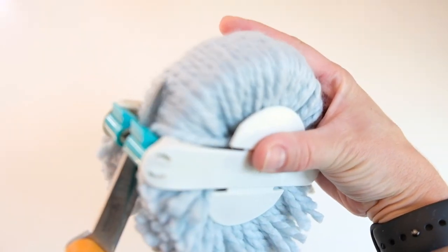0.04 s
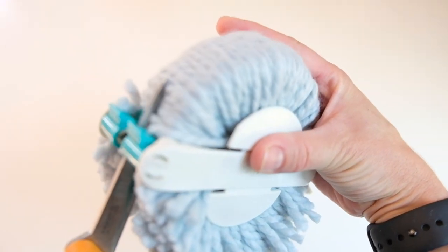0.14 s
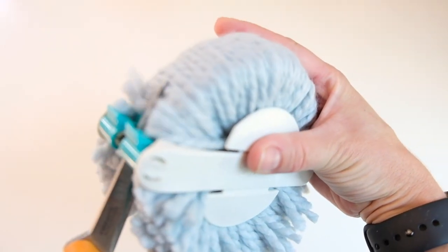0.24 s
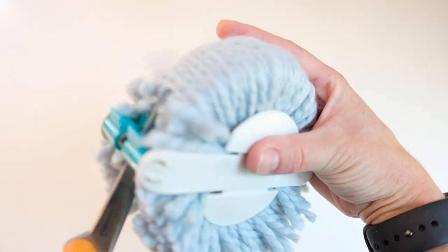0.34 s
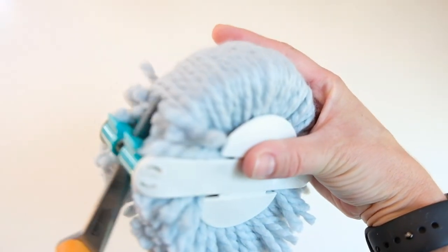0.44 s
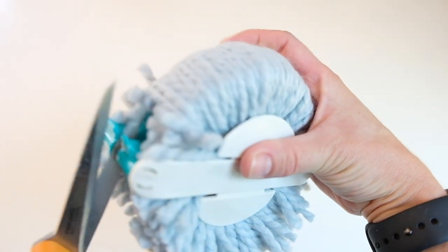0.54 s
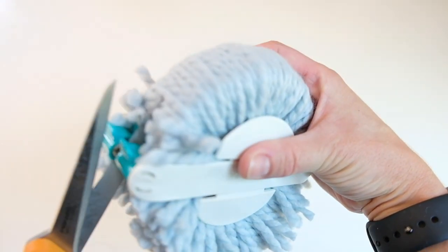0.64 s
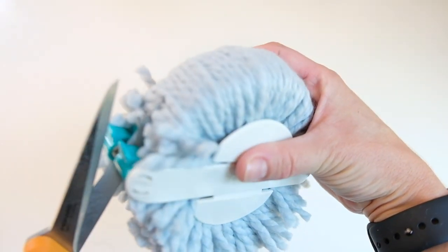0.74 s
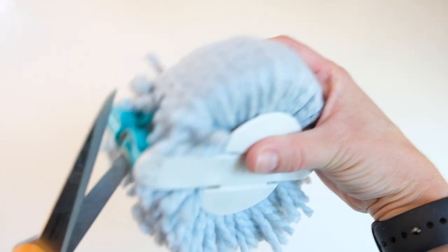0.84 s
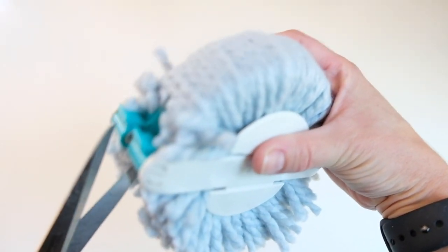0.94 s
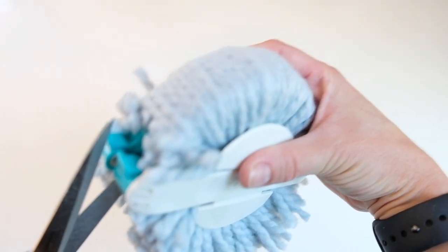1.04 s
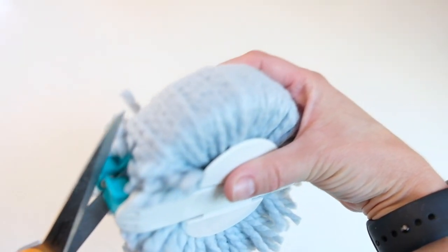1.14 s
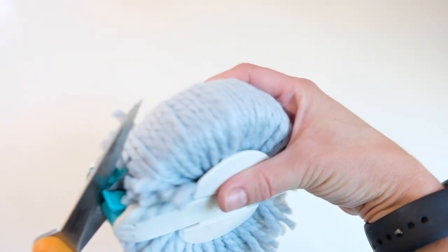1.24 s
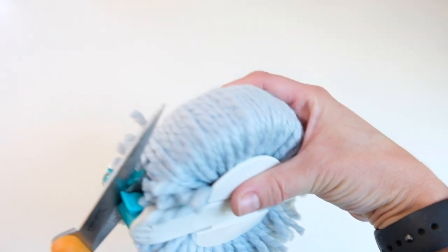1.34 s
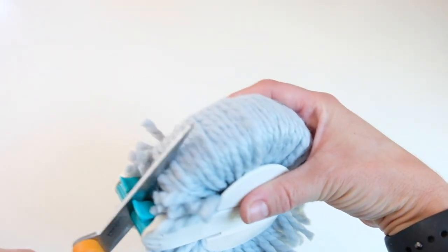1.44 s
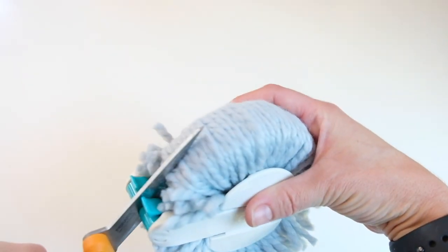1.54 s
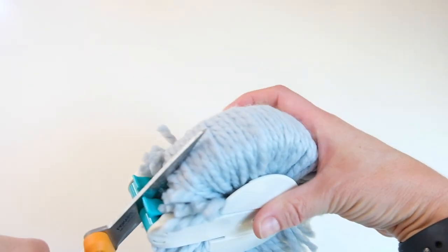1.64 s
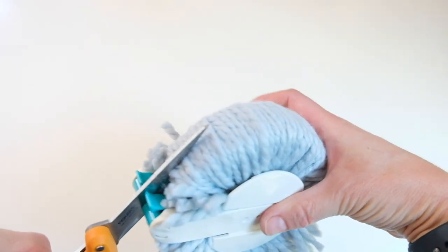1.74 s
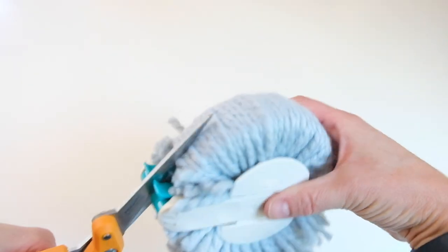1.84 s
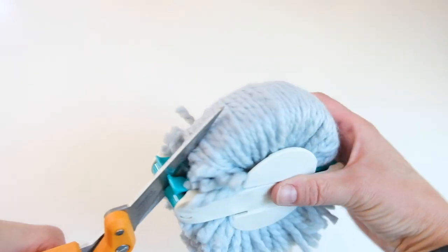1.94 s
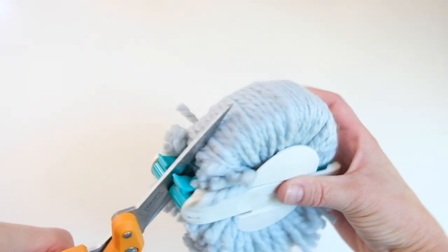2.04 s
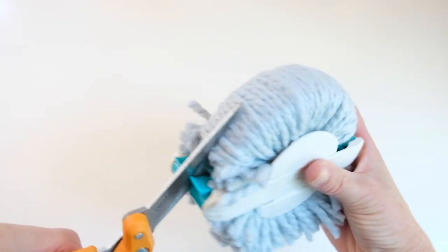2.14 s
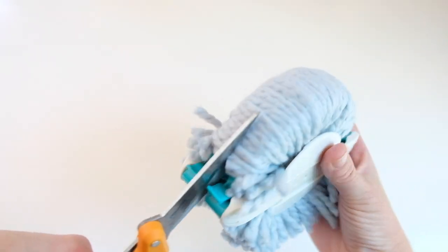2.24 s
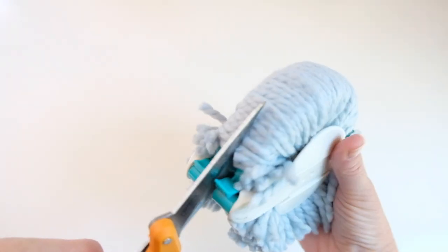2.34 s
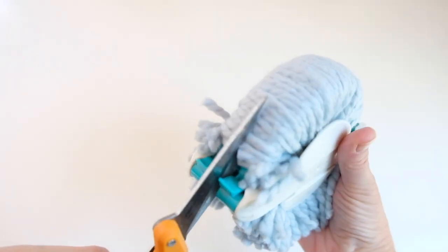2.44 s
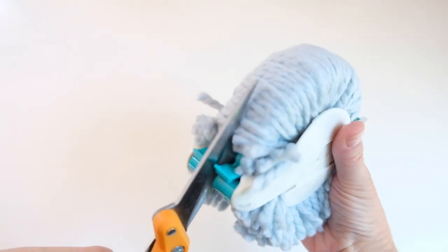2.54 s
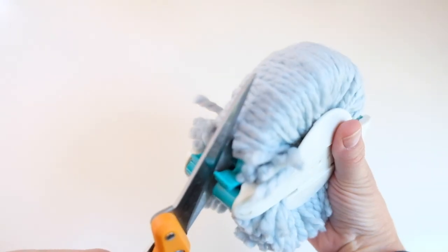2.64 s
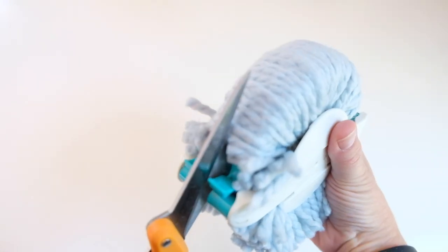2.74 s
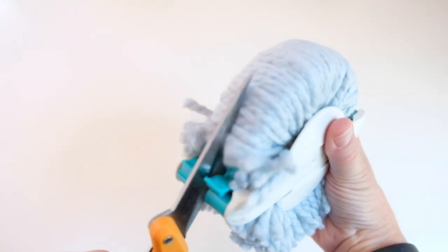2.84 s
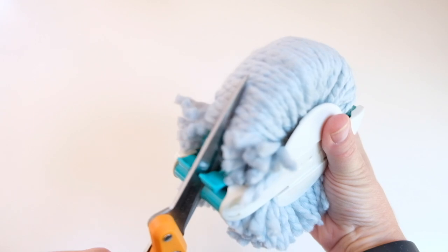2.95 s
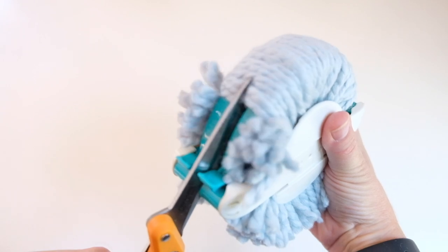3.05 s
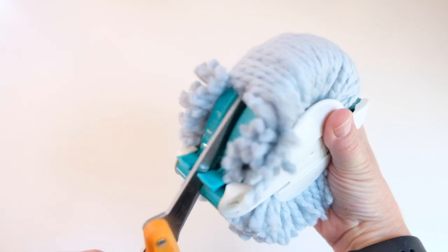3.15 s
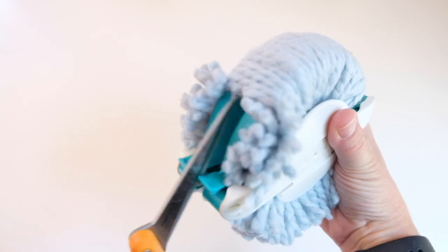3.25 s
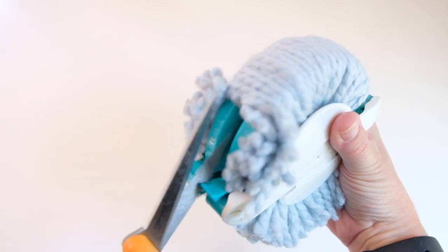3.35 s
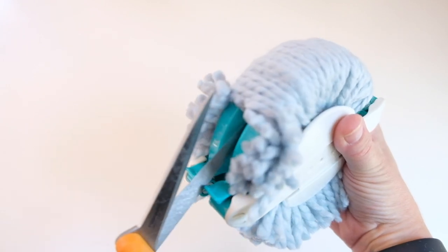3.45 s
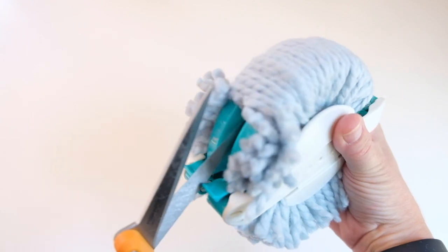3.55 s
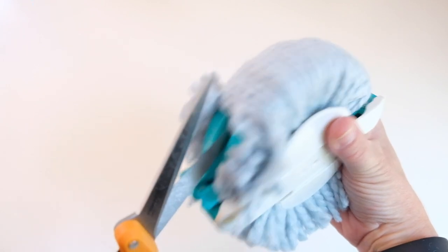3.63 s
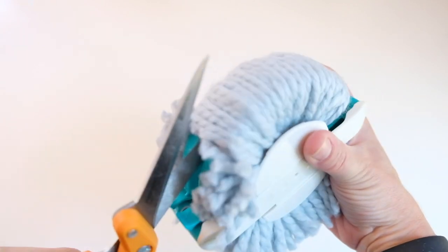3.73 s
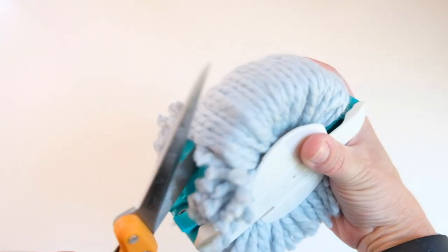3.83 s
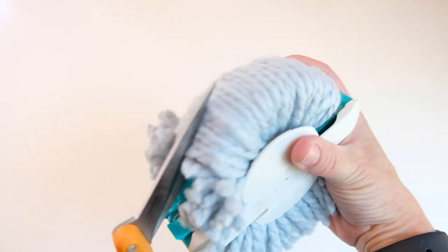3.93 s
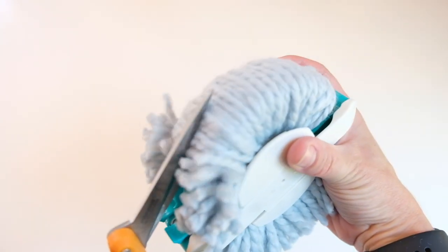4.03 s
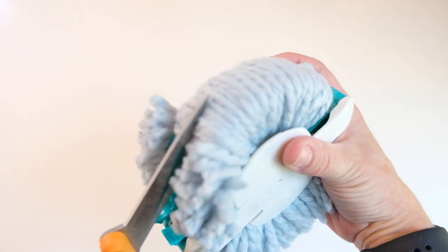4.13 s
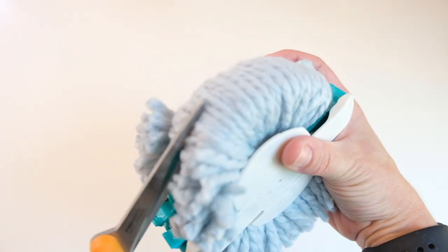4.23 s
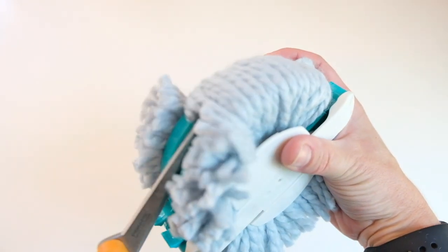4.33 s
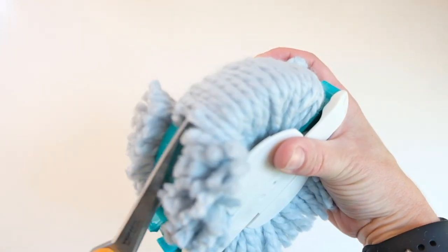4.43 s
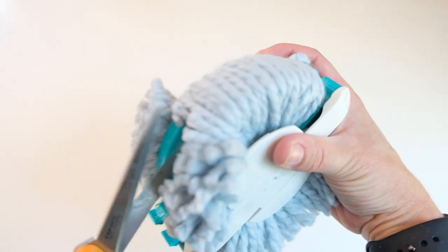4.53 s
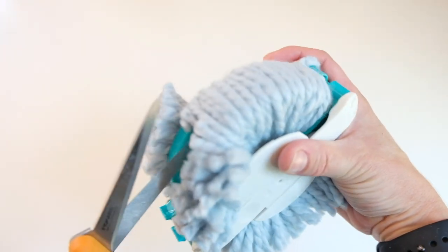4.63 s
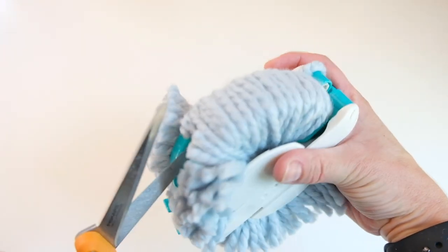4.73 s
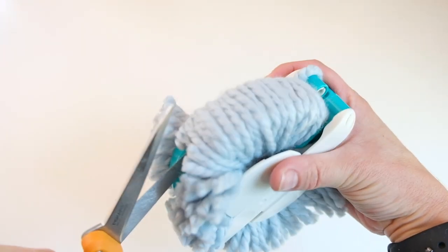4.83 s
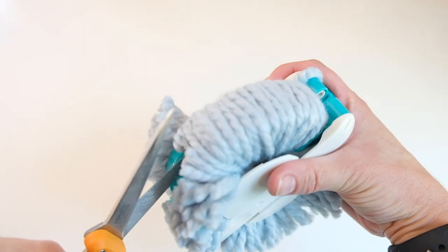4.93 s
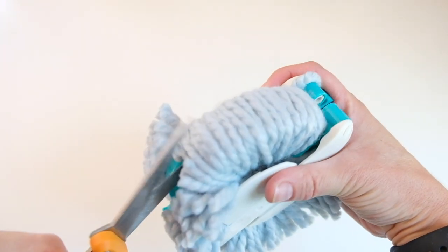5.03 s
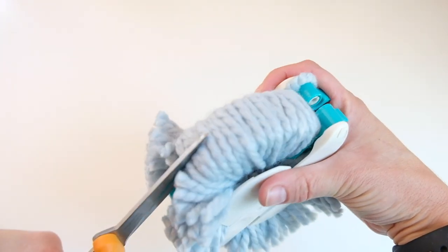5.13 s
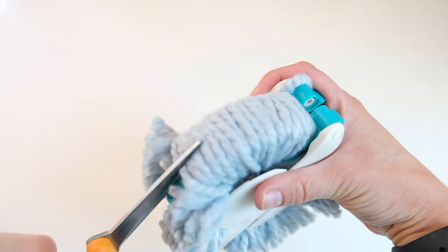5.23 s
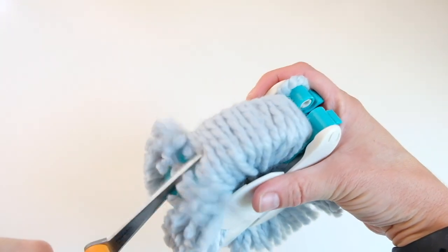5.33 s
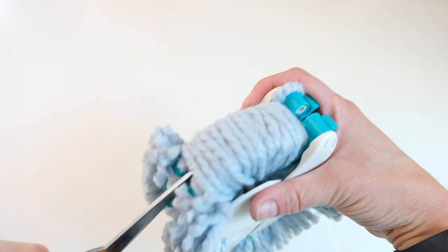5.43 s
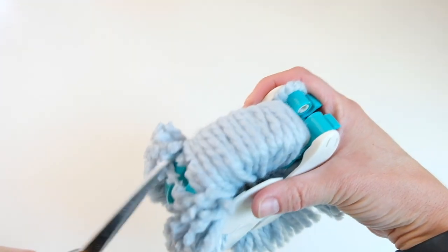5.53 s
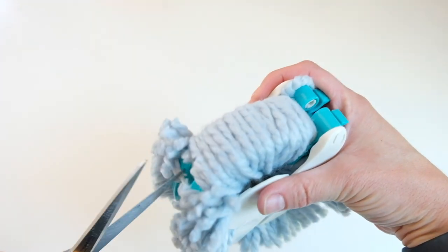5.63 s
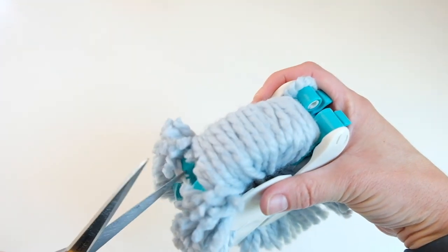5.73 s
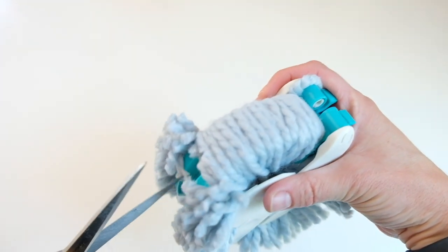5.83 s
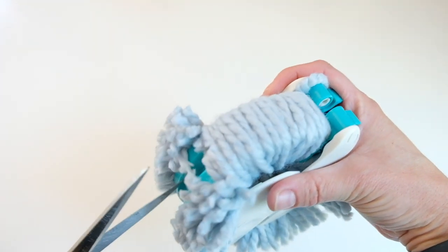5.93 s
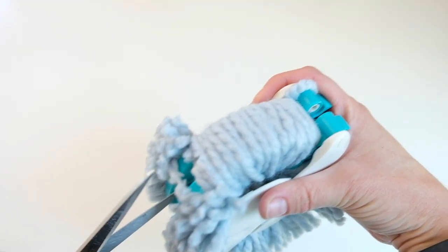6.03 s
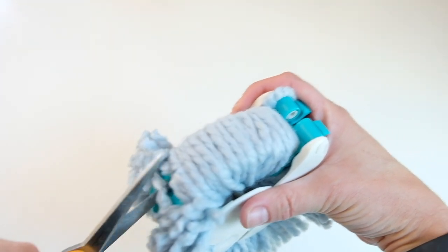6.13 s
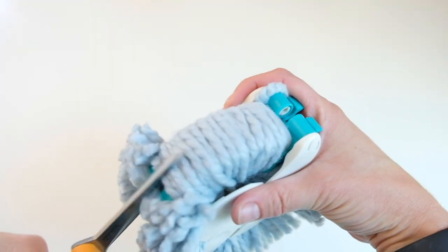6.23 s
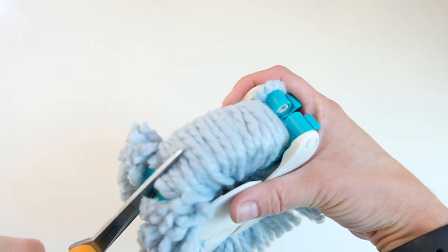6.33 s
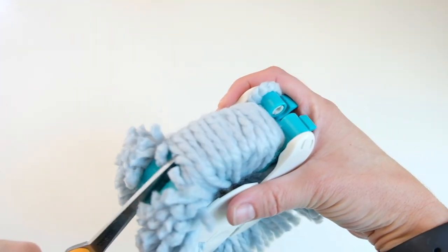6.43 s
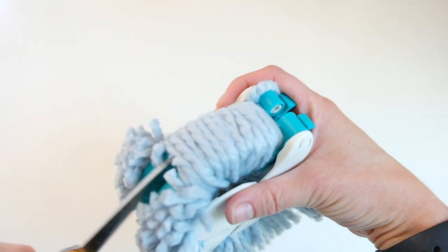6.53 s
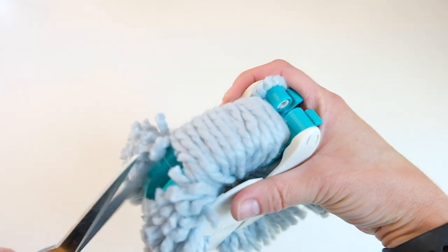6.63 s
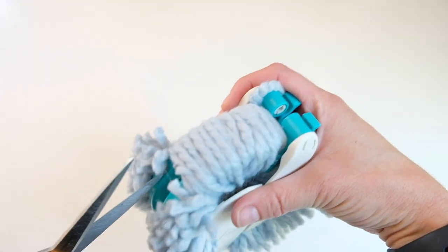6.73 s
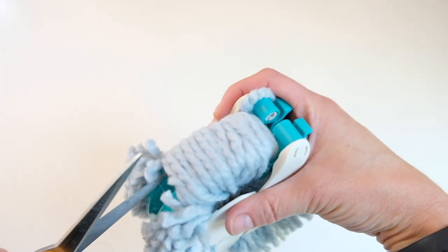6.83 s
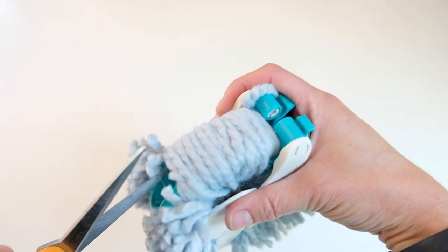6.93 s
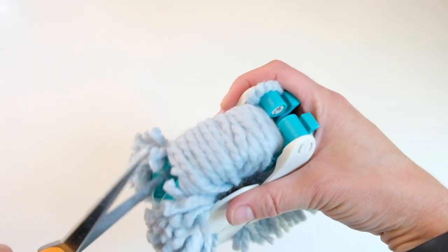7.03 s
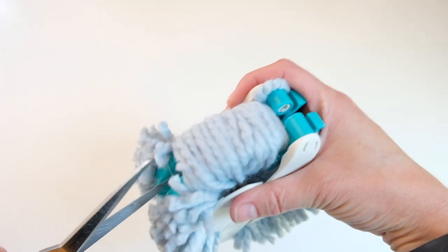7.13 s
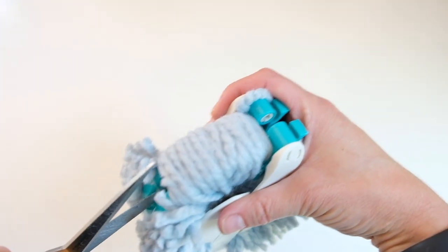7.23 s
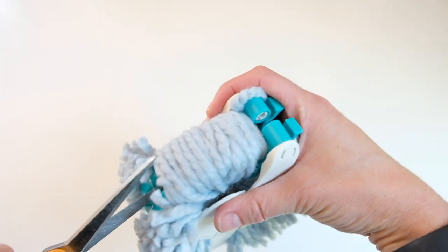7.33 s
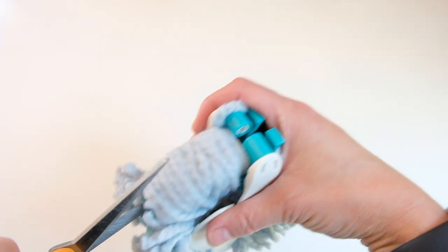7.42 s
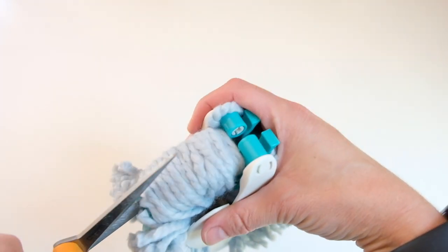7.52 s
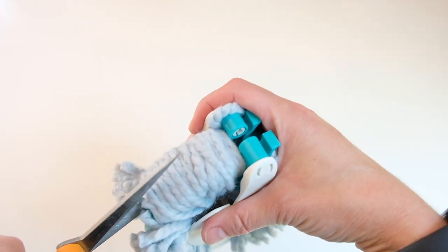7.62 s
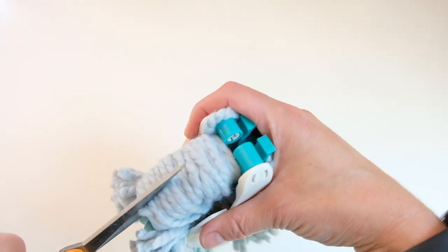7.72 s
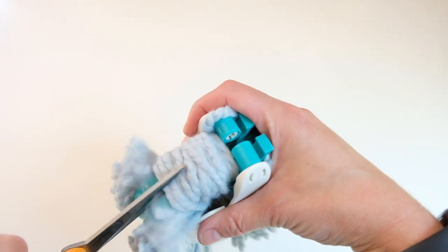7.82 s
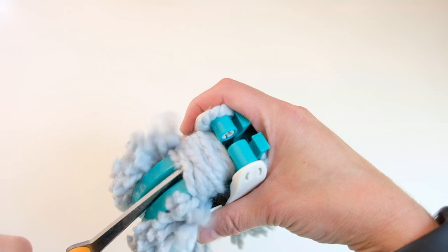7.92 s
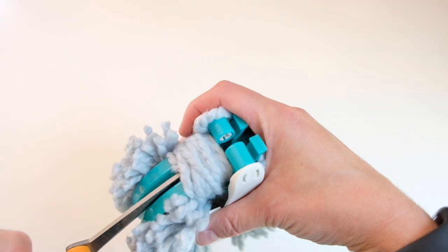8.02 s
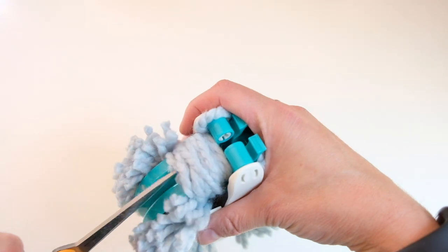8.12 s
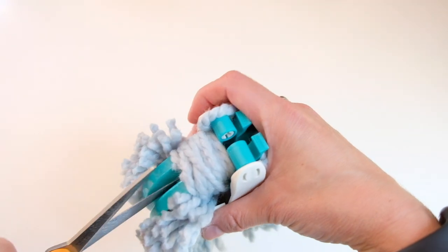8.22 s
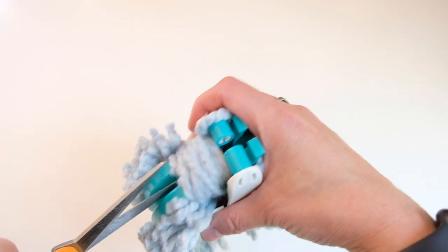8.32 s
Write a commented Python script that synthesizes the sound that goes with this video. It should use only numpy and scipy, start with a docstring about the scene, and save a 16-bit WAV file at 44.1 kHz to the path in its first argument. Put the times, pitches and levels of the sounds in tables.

```python
"""In a quiet room, close by, steel scissors cut thick yarn wound on a plastic pompom maker.
In each stroke the blades rub, strands part one after another, and the last bundle gives with a sharp snip.
Between strokes the blades knock on the plastic and push into the wool, and the hand turns the tool, once
with a faint squeak. Cutting, rubbing and rustling are made of many tiny random clicks; knocks are short
blows that ring. The table and walls echo, and something hums faintly behind."""
import sys
import numpy as np
from scipy import signal
from scipy.fft import rfft, irfft
from scipy.io import wavfile
from scipy.ndimage import uniform_filter1d

SR = 44100
rng = np.random.default_rng(int(sys.argv[2]) if len(sys.argv) > 2 else 0)


def wrap_up_sound(samples):
    """Save the sound to the file named by the first command line argument, as 16-bit audio."""
    columns = np.atleast_2d(samples).T
    # keep every value between -1 and 1, then stretch to whole-number steps
    tamed = np.clip(columns, -1, 1)
    steps = np.round(tamed * 32767).astype(np.int16)
    wavfile.write(sys.argv[1], SR, steps)


N = 369161

# The blades shut. Each row: start in seconds, relative level in dB, added brightness in dB per octave,
# how many seconds earlier the bundle tears, relative level of the squeezed wool in dB.
SNIPS = [(0.319, -18, -0.1, 0.0023, -62.5), (3.115, -17.5, 1, 0.0026, -63),
         (4.294, -18.5, 2.5, 0.0019, -66), (5.3608, -18.5, 2.7, 0.0013, -66.5),
         (6.4367, -23, 1.5, 0.00097, -77), (7.914, -20, -1.6, 0.0044, -68)]
# Scissors hit plastic. Each row: start in seconds, relative level in dB, hardness in dB
# (minus is hollow body, plus is steel edge), main ringing pitch in Hz.
KNOCKS = [(0.4846, -40, -2.5, 1830), (0.493, -40, -2, 1500), (0.9104, -46.5, 5.5, 2860),
          (1.0042, -46.5, -12, 1630), (1.048, -43, 5.5, 2750), (1.1337, -49, -2.5, 3550),
          (1.166, -54, -5, 2970), (1.388, -53.5, -5, 3900), (2.058, -54.5, -8, 3800),
          (2.2137, -56, -7, 3700), (3.273, -41.5, 0.5, 2930), (3.356, -43.5, -4.5, 3250),
          (3.3859, -33, -2.5, 3350), (3.672, -49, 1, 3770), (3.7015, -43.5, 9, 5900),
          (4.3113, -25, 2, 1860), (4.5179, -38, -2.5, 1970), (5.6378, -33.5, -5.5, 2730),
          (6.6862, -33.5, -3.5, 1860), (7.0985, -36, 4.5, 2250), (7.2463, -43.5, 6.5, 2290),
          (7.2722, -44.5, -3, 2450), (7.435, -47.5, -2.5, 2320), (7.473, -52.5, -11, 2300),
          (8.1816, -26, 5, 2560), (8.2327, -36, 0.5, 3000)]
# The tones the steel blades ring with. Each row: pitch in Hz, width in Hz, gain in dB.
BLADE_MODES = [(2845, 160, -11.5), (4740, 300, -2), (7540, 530, -10), (8810, 400, 0), (10040, 400, -1.5),
               (12950, 810, -10)]


def from_db(db):
    """Turn decibels into a number to multiply by."""
    return 10 ** (np.asarray(db) / 20)


def rms_one(x):
    """Scale a sound so that its average level (rms) is 1."""
    return x / np.sqrt(np.mean(x ** 2) + 1e-20)


def at_level(sound, where, level_db):
    """Scale a sound so that the chosen part has the given average level."""
    return sound * from_db(level_db) / np.sqrt(np.mean(sound[where] ** 2) + 1e-20)


def at_hz(points, hz):
    """Read between the rows of a frequency table, giving each octave equal room."""
    freqs, values = np.transpose(points)
    return np.interp(np.log(np.maximum(hz, 1)), np.log(freqs), values)


def add(track, s, sound):
    """Mix a sound into the track, starting at s seconds."""
    start = round(s * SR)
    sound = sound[max(-start, 0):max(N - start, 0)]
    track[max(start, 0):max(start, 0) + len(sound)] += sound


def colour(x, spectrum, tilt_db=0, size=1024):
    """Shape a sound's lows and highs; tilt_db brightens it by that much per octave above 1000 Hz."""
    hz = np.arange(size // 2 + 1) * SR / size
    octaves = np.log2(np.maximum(hz, 1000) / 1000)
    gains = from_db(at_hz(spectrum, hz) + tilt_db * octaves)
    # Build a minimum-phase filter, so that nothing sounds ahead of a click.
    cepstrum = irfft(np.log(gains))
    cepstrum[1:size // 2] *= 2
    cepstrum[size // 2 + 1:] = 0
    response = irfft(np.exp(rfft(cepstrum)))
    return signal.fftconvolve(x, response / np.linalg.norm(response))[:len(x)]


def resonate(x, hz, width_hz):
    """Ring at one pitch; the wider the resonance, the sooner it dies away."""
    radius = np.exp(-np.pi * width_hz / SR)
    feed = np.array([1, 0, -1]) * (1 - radius ** 2) / 2
    feedback = [1, -2 * radius * np.cos(2 * np.pi * hz / SR), radius ** 2]
    return signal.lfilter(feed, feedback, x)


def ringing(x, modes):
    """A shaken object rings with all its own tones (modes) at once."""
    return sum(from_db(db) * resonate(x, hz, width_hz) for hz, width_hz, db in modes)


def drift(rate):
    """A curve that wanders around zero, heading for a new random value rate times a second."""
    steps = np.arange(N) * rate / SR
    count = int(steps[-1]) + 2
    return np.interp(steps, np.arange(count), rng.standard_normal(count))


def fibres(length, per_s, spread_db):
    """Tiny cracks at random moments and of uneven size."""
    sizes = from_db(spread_db * np.minimum(rng.exponential(1, length), 4))
    cracking = rng.random(length) < per_s / SR
    return rms_one(cracking * sizes * rng.choice([-1, 1], length))


def swell(half_s, steepness):
    """Give the time around a push's peak, and its force, which builds quickly and lets go more slowly."""
    t = np.arange(-4096, 4096) / SR
    from_peak = np.minimum(steepness * abs(t) / half_s, 50)
    return t, np.where(t < 0, np.exp(-from_peak ** 2 / 2), 1 / np.cosh(from_peak))


def bump(middle_s, build_s, release_s):
    """A smooth movement of the hand: from 0 to 1 and back."""
    t = np.arange(N) / SR - middle_s
    width_s = np.where(t < 0, build_s, release_s)
    return np.exp(-np.minimum((t / width_s) ** 2 / 2, 20))


def background(waver_db=1.0, air_db=-65):
    """Even room noise and a slightly wavering hum."""
    # The hum swells and fades. Each row: time in seconds, level in dB.
    hum_levels = [(0.0, -75), (0.44, -69), (2.38, -74), (2.68, -85), (3.35, -69), (4.94, -72.5),
                  (5.5, -63.5), (6.95, -67), (8.37, -64)]
    # The hum's tones. Each row: pitch in Hz, relative level in dB.
    hum_tones = [(113.4, -15.5), (226.8, 0), (354, -17)]
    # The tone colour of the room noise. Each row: frequency in Hz, relative level in dB.
    air_colour = [(12, -41.5), (20, 1), (72, 3.5), (171, -4), (225, -2.5), (282, -5.5), (333, -6.5),
                  (614, -10.5), (834, -11.5), (1270, -17.5), (1670, -22.5), (5690, -28), (8400, -26),
                  (14300, -22.5), (15500, -24.5)]
    t = np.arange(N) / SR
    hum = np.zeros(N)
    for hz, db in hum_tones:
        hum += from_db(db + waver_db * drift(2.7)) * np.sin(2 * np.pi * hz * t + .4 * drift(4))
    hum_level = from_db(np.interp(t, *np.transpose(hum_levels)))
    air = colour(rng.standard_normal(N), air_colour, size=8192)
    return np.sqrt(2) * hum_level * hum + from_db(air_db) * air


def wool(rest_db=-71.5, stir_db=-73.5, flutter_db=1.55, gain_db=1.0):
    """Fibres brush past fingers and blades in uneven clumps, most around each stroke and knock."""
    # The tone colour of the rustle. Each row: frequency in Hz, relative level in dB.
    wool_colour = [(100, 4.5), (350, 3), (600, -0.5), (1000, -2), (2200, -1.5), (4000, -6.5), (8500, -6),
                   (12000, -21), (15500, -29.5)]
    squeezes = [from_db(db) * bump(s, build_s=.22, release_s=.23) for s, *_, db in SNIPS]
    stirs = [from_db(stir_db) * bump(s, build_s=.08, release_s=.08) for s, *_ in KNOCKS]
    pressure = np.sqrt(from_db(rest_db) ** 2 + sum(move ** 2 for move in squeezes + stirs))
    clumps = from_db(gain_db + flutter_db * drift(45))
    return colour(pressure * clumps * fibres(N, per_s=5000, spread_db=3.0), wool_colour)


def rubs(typical_db=-36.5, ring_db=10.5, gain_db=-5.5):
    """Blade slides on blade: the friction hisses and sets the steel singing."""
    # The slides. Each row: peak time in seconds, relative level in dB, rough half length in seconds.
    slides = [(0.024, -46.5, 0.026), (2.869, -42.5, 0.012), (3.99, -41.5, 0.011), (4.789, -57.5, .022),
              (5.121, -58.5, 0.0088), (6.265, -49.5, 0.015), (6.39, -49.5, 0.02), (6.42, -31.5, 0.0037),
              (6.427, -29, .0027), (7.802, -44.5, 0.0074), (7.845, -39, 0.011)]
    # The tone colour of the scrape. Each row: frequency in Hz, relative level in dB.
    rub_colour = [(200, -24), (600, 9), (1200, -2.5), (2500, 5), (4500, 2), (6500, -4.5), (10000, -7.5),
                  (13000, -12), (15500, -22)]
    out = np.zeros(N)
    for s, level_db, half_s in slides:
        t, force = swell(half_s, steepness=1.72)
        friction = force * fibres(len(t), per_s=8900, spread_db=6.0)
        steel = from_db(ring_db) * ringing(friction, BLADE_MODES)
        tilt_db = 6.5 + .4445 * (level_db - typical_db)  # a harder rub is brighter
        scrape = colour(friction + steel, rub_colour, tilt_db)
        add(out, s + t[0], nearby(at_level(scrape, abs(t) < half_s, level_db + gain_db)))
    return out


def pushes(gain_db=-1.0):
    """A blade pushed along the plastic, under the loops of wool, gives a dull rasp."""
    # The pushes. Each row: peak time in seconds, relative level in dB, rough half length in seconds.
    moves = [(0.081, -47, 0.013), (0.509, -57.5, 0.012), (1.5, -57.5, .03), (2.866, -50.5, 0.024),
             (3.679, -62.5, 0.02), (3.913, -52, 0.011), (3.976, -55.5, 0.019), (6.869, -69, 0.026),
             (7.753, -56, 0.027)]
    # The tone colour of the rasp. Each row: frequency in Hz, relative level in dB.
    push_colour = [(300, -17), (800, -2), (1200, 6.5), (1600, 0.5), (2400, 2.5), (4400, -4.5),
                   (6500, -17.5), (10000, -4), (15500, -26)]
    out = np.zeros(N)
    for s, level_db, half_s in moves:
        t, force = swell(half_s, steepness=1.4)
        rasp = colour(force * fibres(len(t), per_s=4100, spread_db=5.5), push_colour)
        add(out, s + t[0], nearby(at_level(rasp, abs(t) < half_s, level_db + gain_db)))
    return out


def strands(typical_db=-40, typical_half_s=.0048, tear_db=-28.5, ring_db=2.0, gain_db=-5.0):
    """Strands part one by one, lightly ringing the blades; the last bundle tears just before each snip."""
    # Single strands part. Each row: peak time in seconds, relative level in dB.
    breaks = [(0.106, -40), (0.149, -39.5), (0.226, -35), (0.55, -49.5), (2.892, -38), (2.984, -31.5),
              (3.015, -43.5), (3.332, -45), (4.038, -46), (4.084, -42.5), (4.11, -43.5), (4.2766, -33.5),
              (5.212, -49), (5.259, -41.5), (5.287, -35.5), (5.316, -33.5), (5.594, -47.5), (6.659, -51)]
    # The tone colour of the crunch. Each row: frequency in Hz, relative level in dB.
    strand_colour = [(200, -14), (700, -11), (1700, -10), (2800, 2), (4500, -2.5), (8000, -1.5),
                     (10000, -9.5), (13000, -10.5), (15500, -23)]
    # A tighter strand parts louder and quicker: 14.5 dB more halves its length.
    singles = [(s, db, typical_half_s * .5 ** ((db - typical_db) / 14.5)) for s, db in breaks]
    tears = [(s - tear_s, tear_db, tear_s) for s, _, _, tear_s, _ in SNIPS]
    out = np.zeros(N)
    for s, level_db, half_s in singles + tears:
        t, force = swell(half_s, steepness=1.3)
        cracks = force * fibres(len(t), per_s=11000, spread_db=4.5)
        steel = from_db(ring_db) * ringing(cracks, BLADE_MODES)
        tilt_db = 1.8 + .4445 * (level_db - typical_db)  # it is brighter too
        crunch = colour(cracks + steel, strand_colour, tilt_db)
        add(out, s + t[0], nearby(at_level(crunch, abs(t) < half_s, level_db + gain_db)))
    return out


def snips(burst_s=.0027, after_db=-10.5, fall_s=.004, jolt_db=2.5):
    """Many fibres snap within a few milliseconds, and the blades jump shut with a jolt."""
    # The tones that the jolt sets ringing. Each row: pitch in Hz, width in Hz, gain in dB.
    jolt_modes = [(74, 130, 7), (295, 140, 6), (793, 240, 18), (2770, 160, 15.5)]
    # The tone colour of the snap. Each row: frequency in Hz, relative level in dB.
    snap_colour = [(150, -22), (480, -24.5), (800, -15), (1400, -9.5), (2000, -9.5), (2900, -1),
                   (4200, -3.5), (5000, 2), (6000, 1.5), (8000, 1), (9500, -5.5), (13000, -9.5),
                   (15500, -26)]
    out, t = np.zeros(N), np.arange(2048) / SR
    jolt = from_db(jolt_db) * ringing(signal.unit_impulse(len(t)), jolt_modes)
    fade = from_db(after_db) * np.exp(-np.maximum(t - burst_s, 0) / fall_s)
    force = np.where(t < burst_s, 1, fade)
    for s, level_db, tilt_db, _, _ in SNIPS:
        cracks = force * fibres(len(t), per_s=26000, spread_db=2.0)
        snap = at_level(colour(cracks, snap_colour, tilt_db), t < burst_s, 0)
        add(out, s, nearby(from_db(level_db) * (snap + jolt)))
    return out


def knocks(chatter_db=-21.0, chatter_s=.0026, ring_db=7.0, ring_width_hz=260, gain_db=-2.0):
    """A blow and a brief chatter ring the scissors and plastic, which the hand quickly quiets."""
    # The tones of scissors and plastic together. Each row: pitch in Hz, width in Hz, gain in dB.
    knock_modes = [(318, 440, 0.5), (705, 250, -14), (1110, 620, 0), (2060, 590, 2.5), (3130, 320, -1.5),
                   (5000, 3100, -2), (7380, 600, 1), (8120, 560, -21.5), (12300, 2500, -20)]
    out, t = np.zeros(N), np.arange(2048) / SR
    for s, level_db, hard_db, ring_hz in KNOCKS:
        contact = from_db(chatter_db) * rng.standard_normal(len(t)) * np.exp(-t / chatter_s)
        contact[0] -= 1  # the blow itself
        ring = ringing(contact, knock_modes + [(ring_hz, ring_width_hz, ring_db)])
        # A harder spot gives less low body and more bright edge.
        body = [(300, -2.5 - hard_db), (800, -3 - hard_db)]
        edge = [(1700, .012), (3500, .0029), (6500, -3 + hard_db)]
        knock = colour(ring, body + edge)
        add(out, s, nearby(at_level(knock, t < .004, level_db + gain_db)))
    return out


def regrips(flutter_db=4.5):
    """The hand turns the tool, and skin slides over the hollow plastic with a low rustle."""
    # The turns. Each row: peak time in seconds, level in dB, rough half length in seconds.
    turns = [(0.679, -63, 0.29), (2.341, -66.5, .18)]
    # The tones of the hollow plastic. Each row: pitch in Hz, width in Hz, gain in dB.
    plastic_modes = [(80, 45.5, 1), (330, 76, 3.5), (850, 180, -5)]
    speed = sum(from_db(db) * bump(s, half_s, half_s) for s, db, half_s in turns)
    rustle = rms_one(ringing(fibres(N, per_s=3000, spread_db=3.0), plastic_modes))
    return speed * from_db(flutter_db * drift(30)) * rustle


def squeak(at_s=2.435, half_s=.1, top_hz=2820, sag_hz=258, rough_hz=55, level_db=-68, flutter_db=2.5):
    """The turning tool gives a thin tone that rises and falls in pitch and level."""
    from_peak = np.clip((np.arange(N) / SR - at_s) / half_s, -2, 2)
    hz = top_hz - sag_hz * from_peak ** 2 + rough_hz * drift(400)
    level = from_db(level_db + flutter_db * drift(60)) * np.exp(-from_peak ** 4)
    return level * np.sin(2 * np.pi * np.cumsum(hz) / SR)


def nearby(sound, scatter_db=-5.5, scatter_s=.011, shift=.1):
    """Add quick echoes from the table and things on it, different each time as the hands move."""
    # The echoes. Each row: typical delay in seconds, relative level in dB.
    echoes = [(.0011, -13.5), (.0025, -9), (.0064, -15.5), (.0085, -10.5), (.0097, -13), (0.0113, -22)]
    t = np.arange(2048) / SR
    scatter = rng.standard_normal(len(t)) * np.exp(-t / scatter_s) * (t > .002)
    response = from_db(scatter_db) * scatter / np.linalg.norm(scatter)
    for delay_s, echo_db in echoes:
        shifted_s = delay_s * (1 + shift * rng.uniform(-1, 1))
        response[round(shifted_s * SR)] += from_db(echo_db)
    response = signal.sosfilt(signal.butter(1, 9000, fs=SR, output="sos"), response)
    response[0] += 1  # the direct sound
    return signal.fftconvolve(sound, response)


def walls(x, gap_s=.036, build_s=.0046, tail_db=-12.5):
    """The far walls answer after a gap with a smooth hiss that builds and dies away, band by band."""
    # The tone colour of this echo. Each row: frequency in Hz, relative level in dB.
    tail_colour = [(150, -2), (500, 5), (900, 4), (1500, 6.5), (2500, 1.5), (7000, 1), (10000, -3.5),
                   (15000, -6.5)]
    # How long it lasts. Each row: frequency in Hz, seconds to fade by 60 dB.
    fade_times = [(200, 0.42), (1500, 0.32), (3500, 0.33), (7000, 0.33), (14000, 0.17)]
    block = 32  # samples per step of the energy curves
    t = np.arange(SR // 2 // block) * block / SR
    onset = np.clip((t - gap_s) / build_s, 0, 1)
    white = rng.standard_normal((2, N))
    out, edges_hz = np.zeros(N), np.geomspace(220, 16500, 16)
    for k, (low, high) in enumerate(zip(edges_hz, edges_hz[1:])):
        band = signal.butter(2, [low, high], "band", fs=SR, output="sos")
        centre_hz = np.sqrt(low * high)
        energy = uniform_filter1d(signal.sosfilt(band, x) ** 2, block)[::block]
        decay = onset * from_db(-60 * t / at_hz(fade_times, centre_hz)) ** 2
        stored = np.convolve(np.maximum(energy, 0), decay / decay.sum())[:len(energy)]
        level = np.interp(np.arange(N) / block, np.arange(len(stored)), np.sqrt(stored))
        hiss = rms_one(signal.sosfilt(band, white[k % 2]))
        out += from_db(tail_db + at_hz(tail_colour, centre_hz)) * level * hiss
    return out


def scene(side_air_db=-78.0):
    """Everything is in the middle; only a trace of noise differs between the ears."""
    # The tone colour of that noise. Each row: frequency in Hz, relative level in dB.
    side_colour = [(12, -33), (20, -6), (133, -8.5), (225, -10), (452, -10.5), (686, -12.5), (985, -23),
                   (10500, -16), (15500, -15)]
    close = snips() + strands() + rubs() + pushes() + knocks() + wool() + regrips() + squeak()
    middle = close + walls(close) + background()
    side = from_db(side_air_db) * colour(rng.standard_normal(N), side_colour, size=8192)
    return np.array([middle + side, middle - side])


def record(dry):
    """Cut the highest treble steeply, above 15800 Hz."""
    return signal.sosfilt(signal.ellip(10, .1, 80, 15800, fs=SR, output="sos"), dry)


dry = scene()
out = record(dry)
wrap_up_sound(out)
```